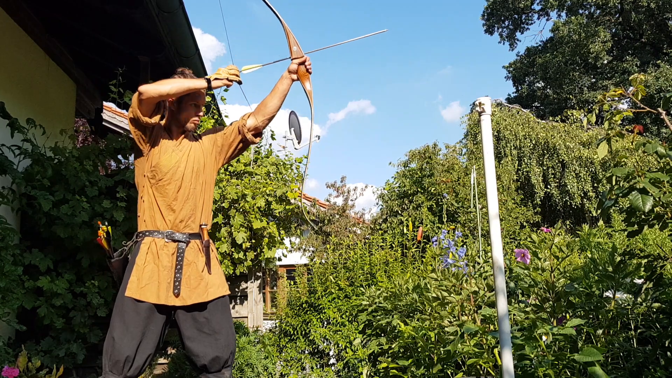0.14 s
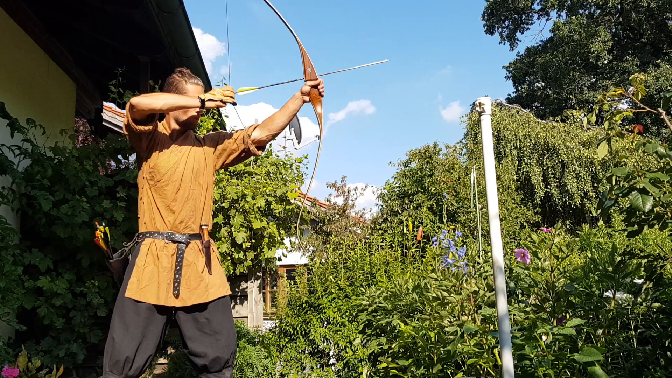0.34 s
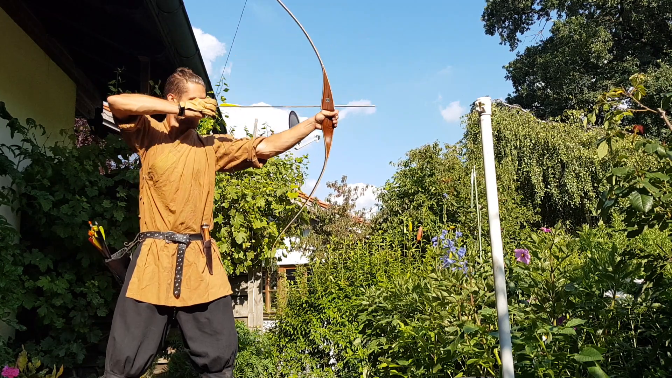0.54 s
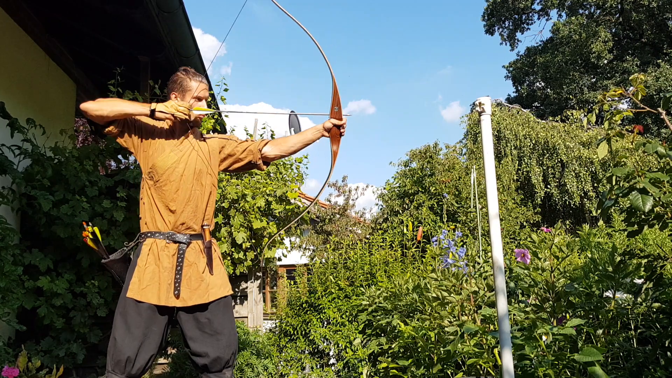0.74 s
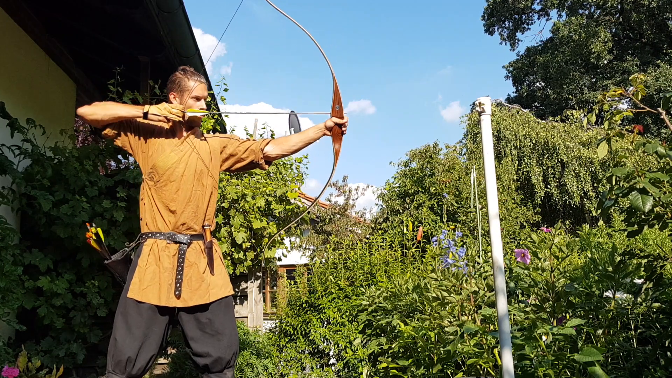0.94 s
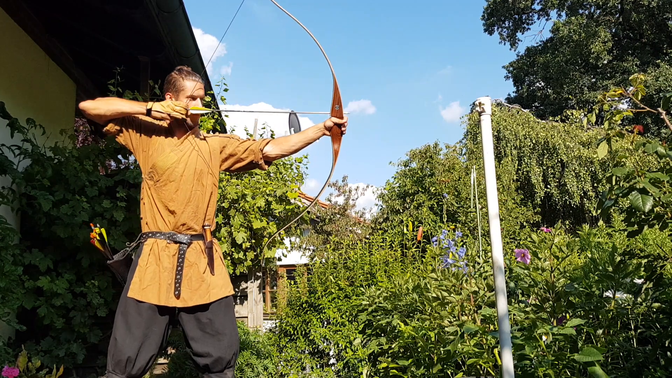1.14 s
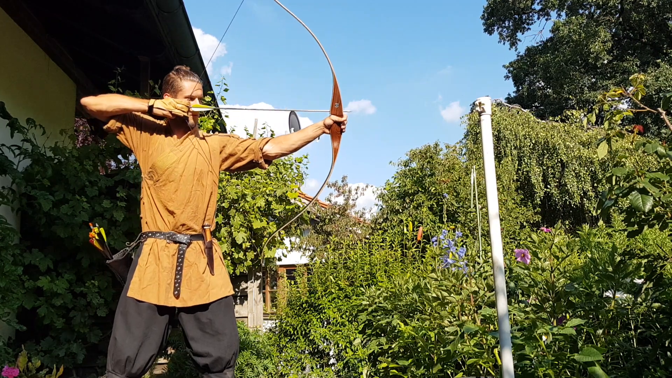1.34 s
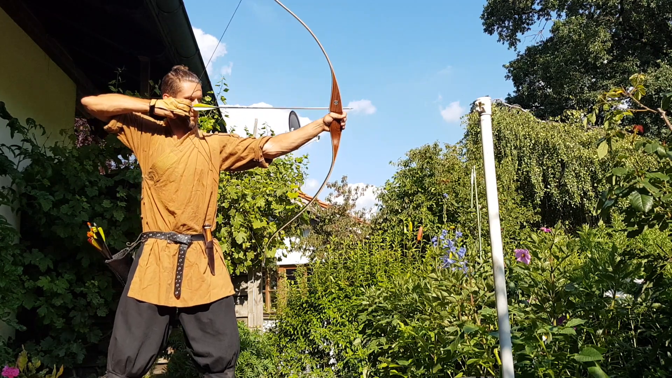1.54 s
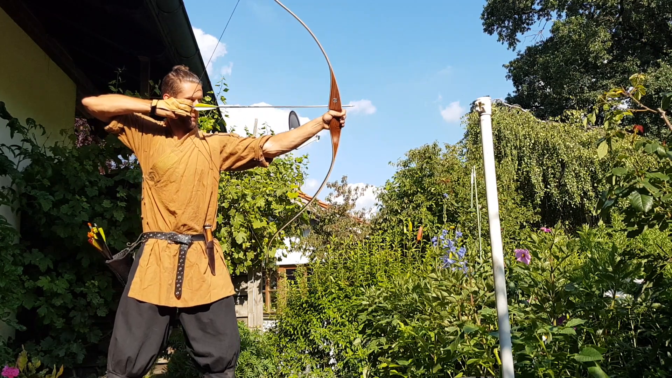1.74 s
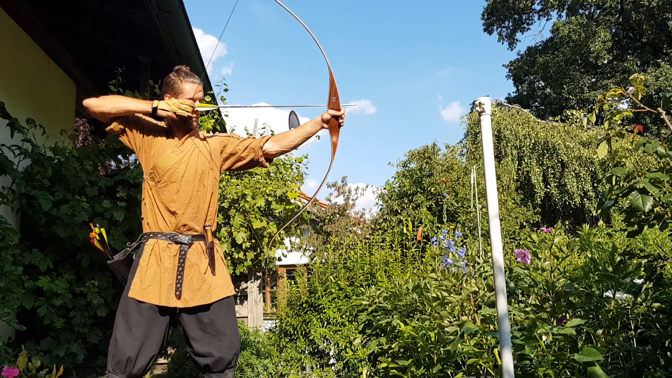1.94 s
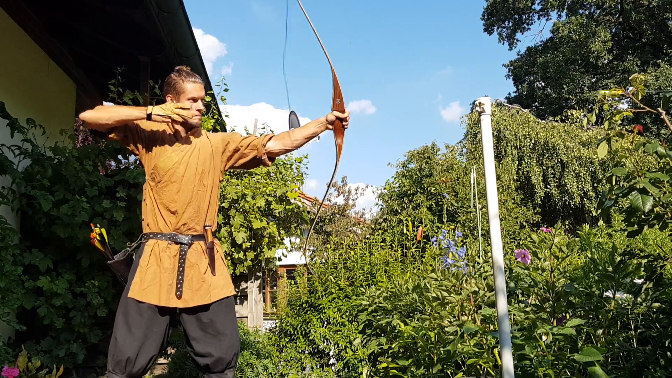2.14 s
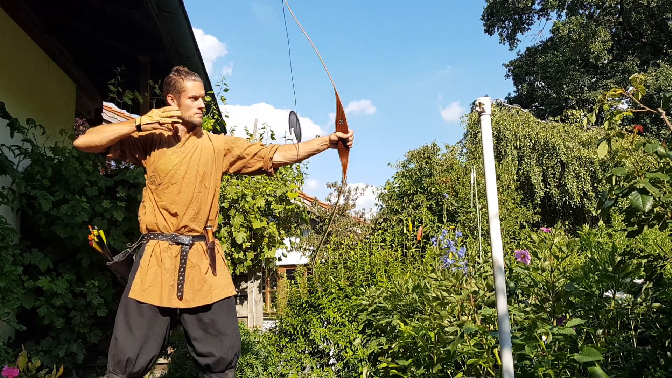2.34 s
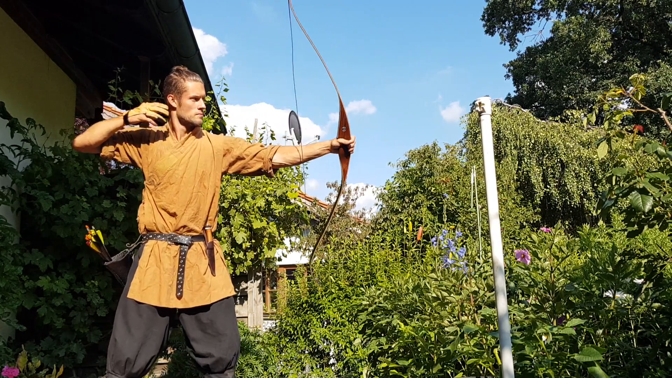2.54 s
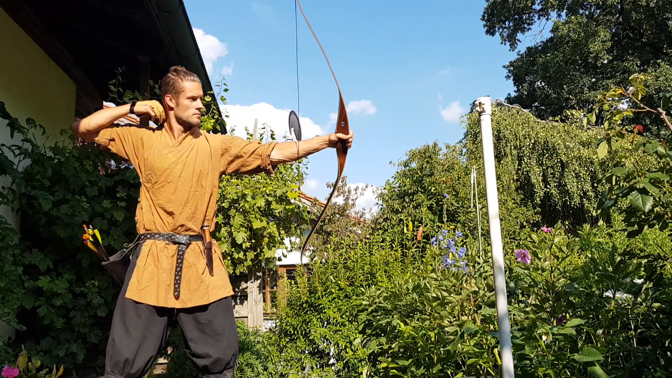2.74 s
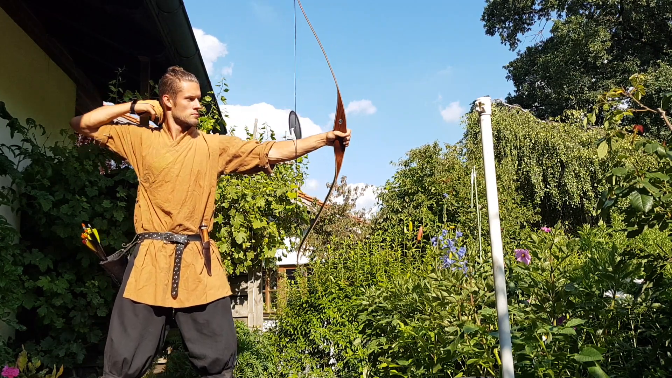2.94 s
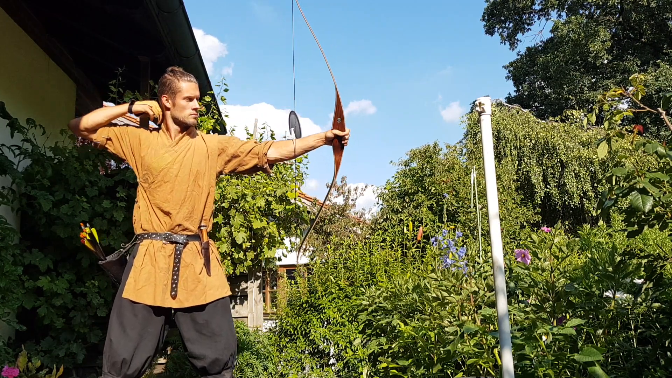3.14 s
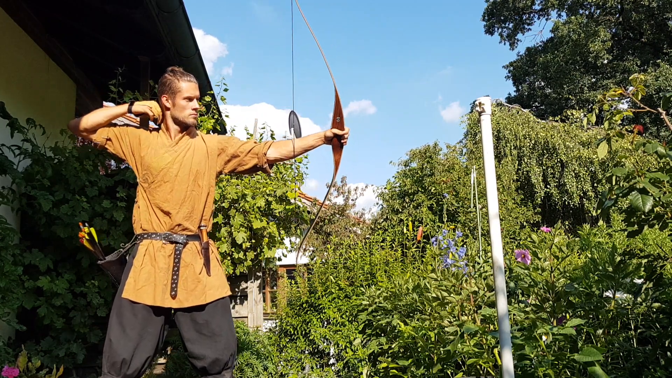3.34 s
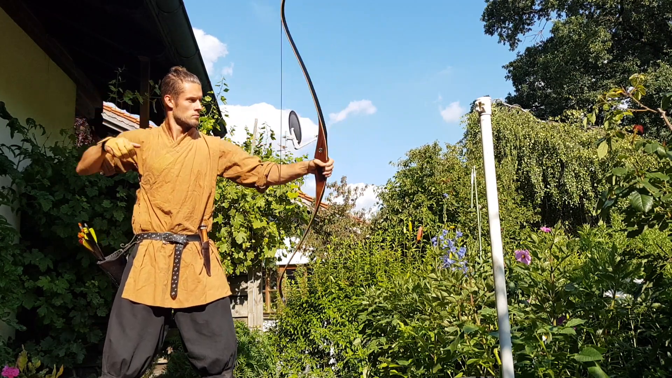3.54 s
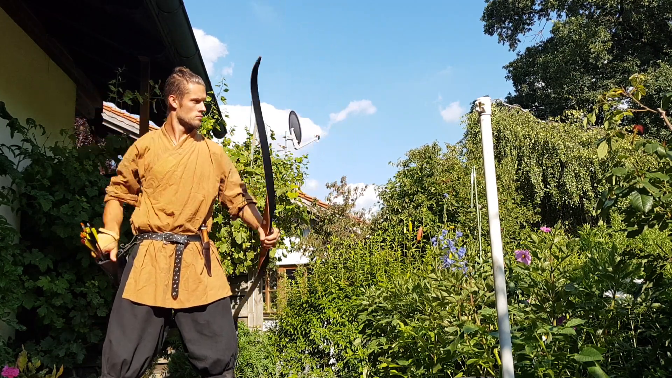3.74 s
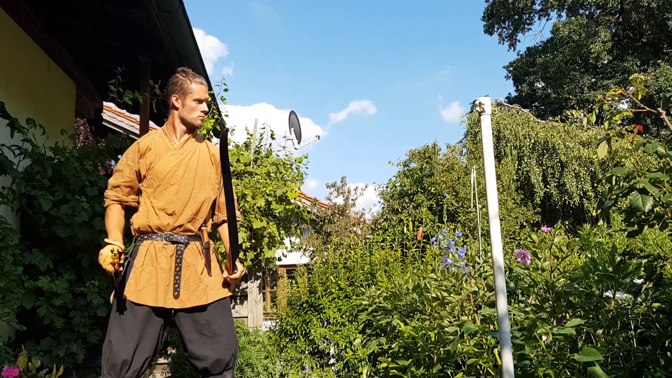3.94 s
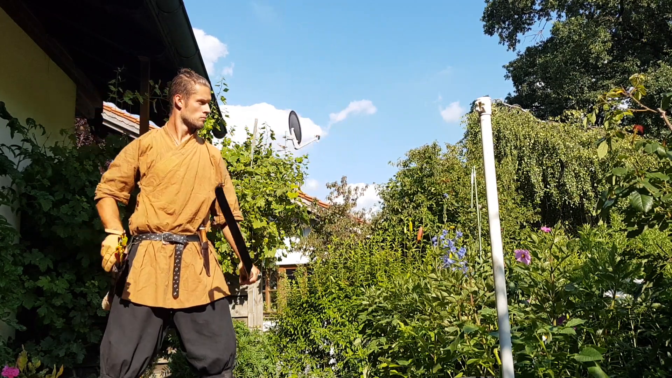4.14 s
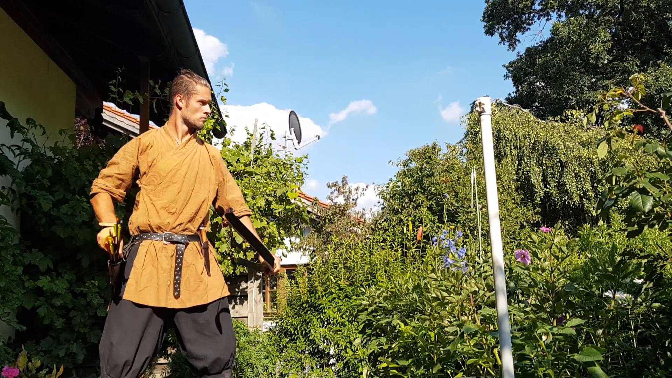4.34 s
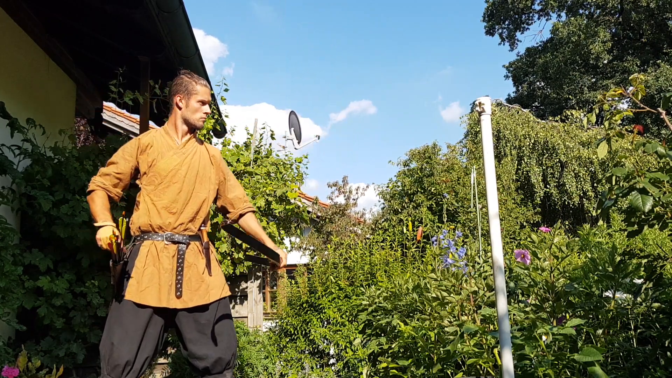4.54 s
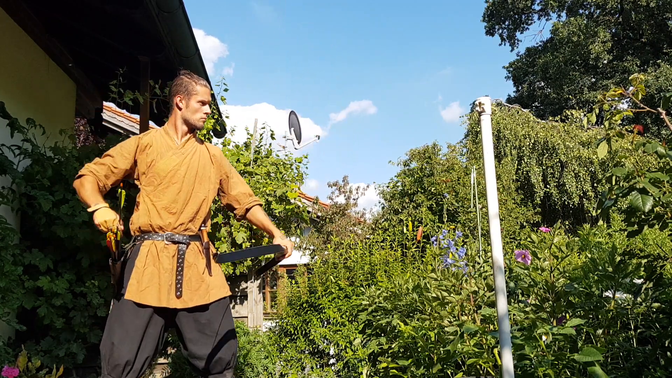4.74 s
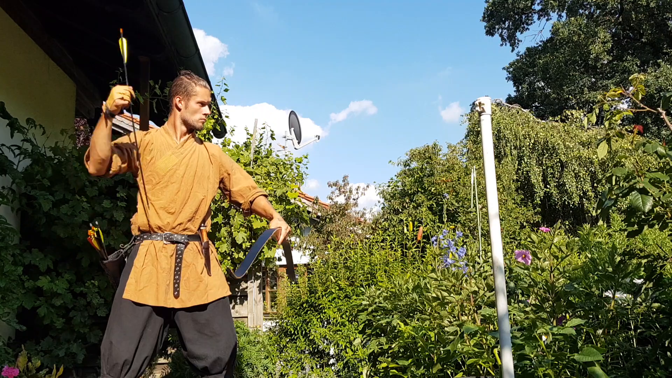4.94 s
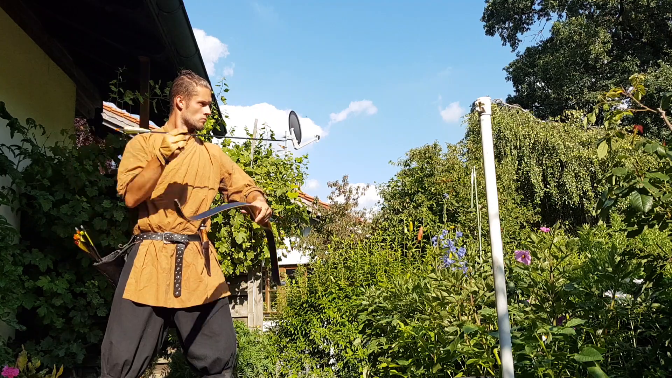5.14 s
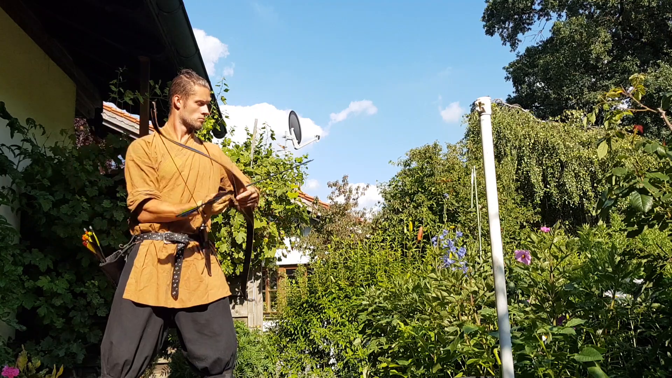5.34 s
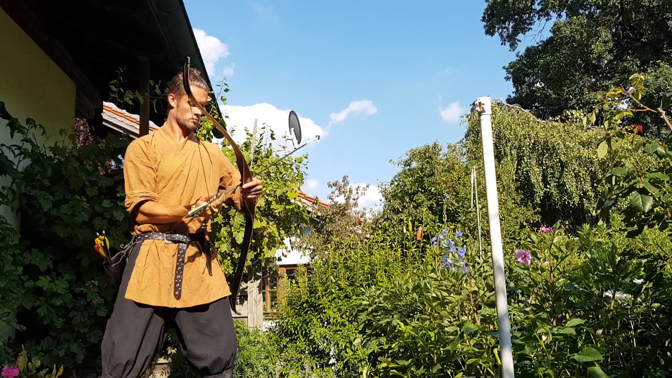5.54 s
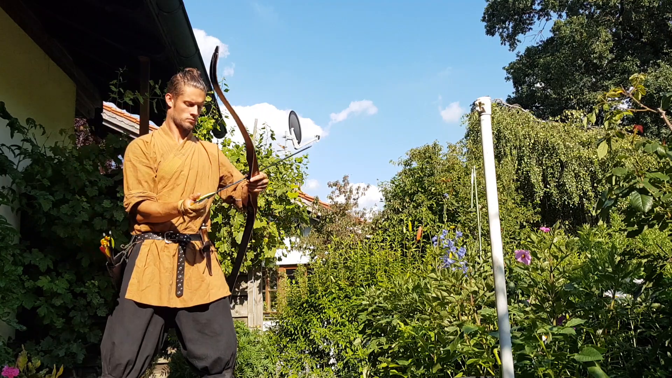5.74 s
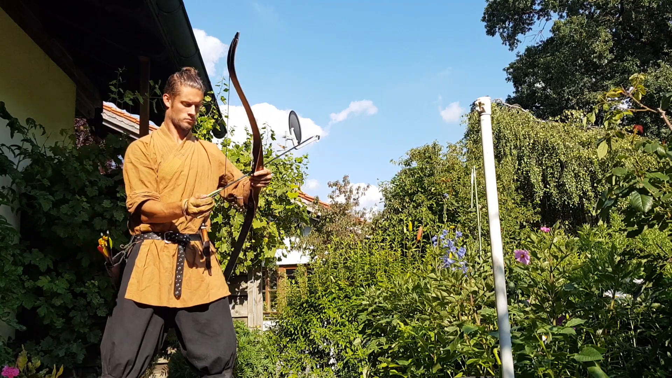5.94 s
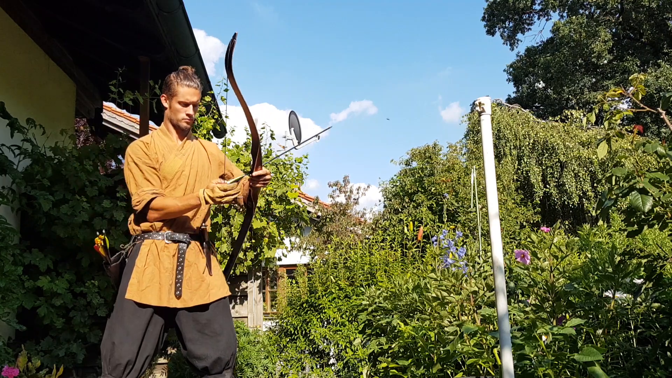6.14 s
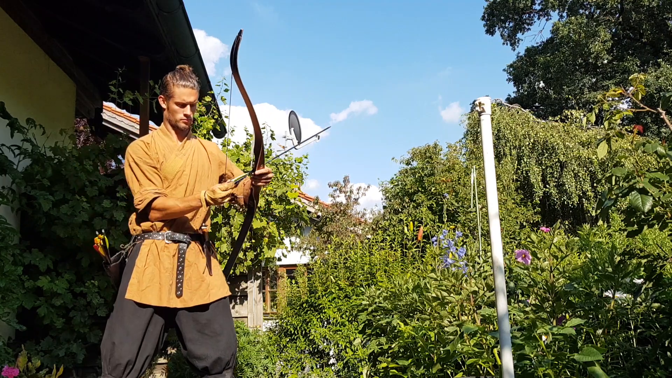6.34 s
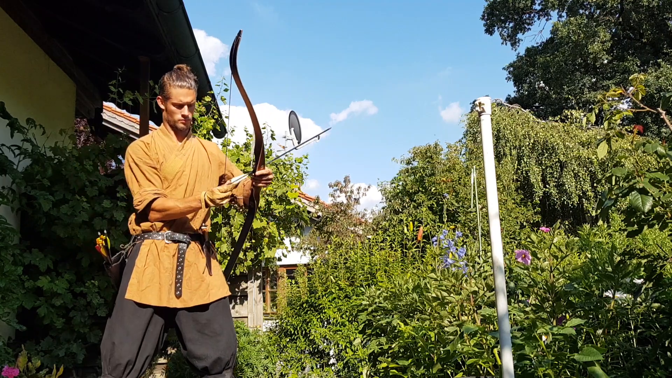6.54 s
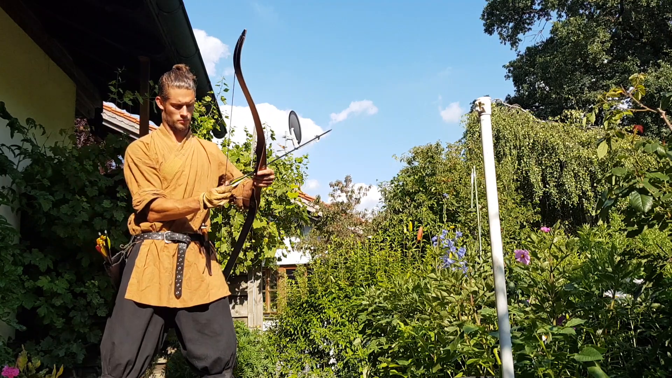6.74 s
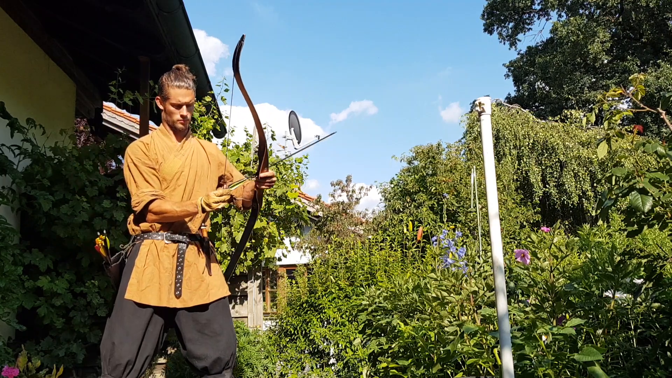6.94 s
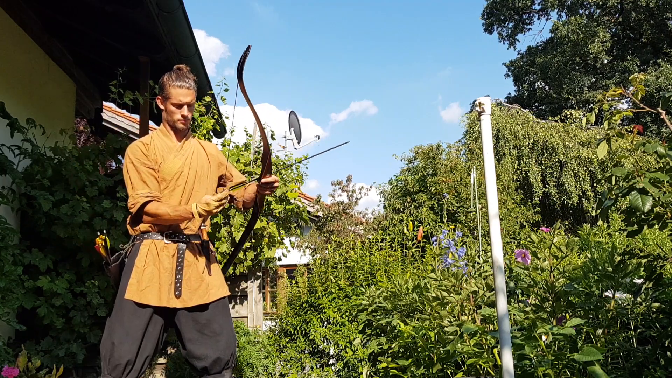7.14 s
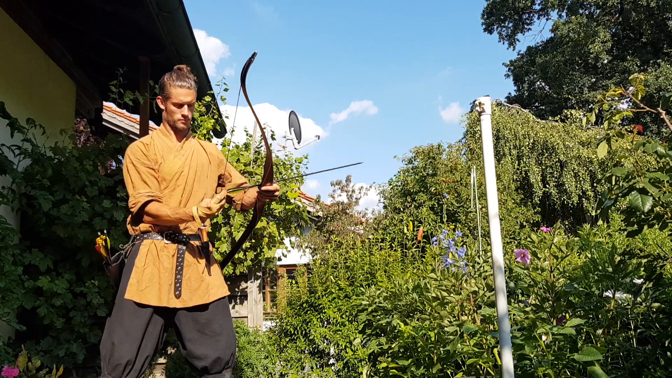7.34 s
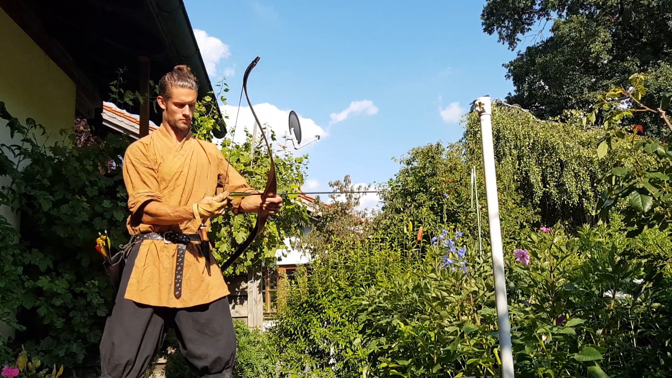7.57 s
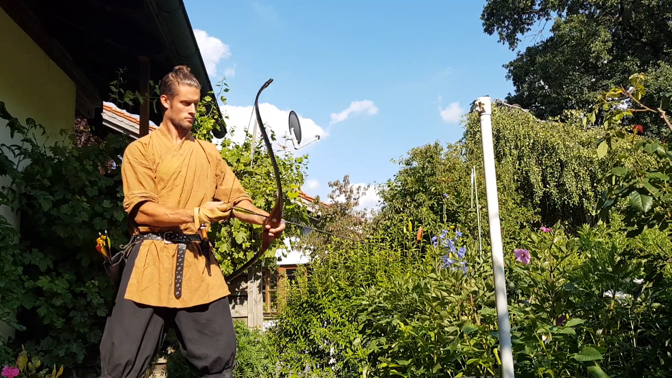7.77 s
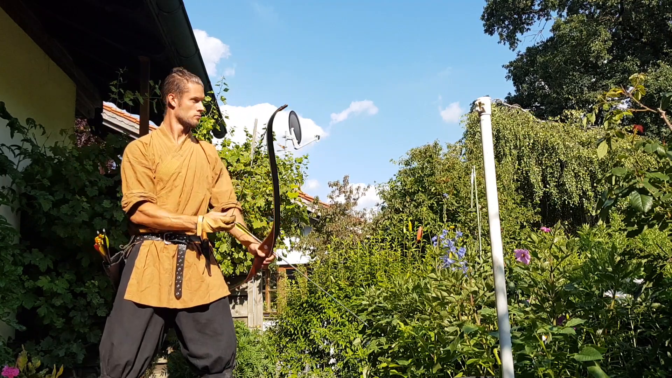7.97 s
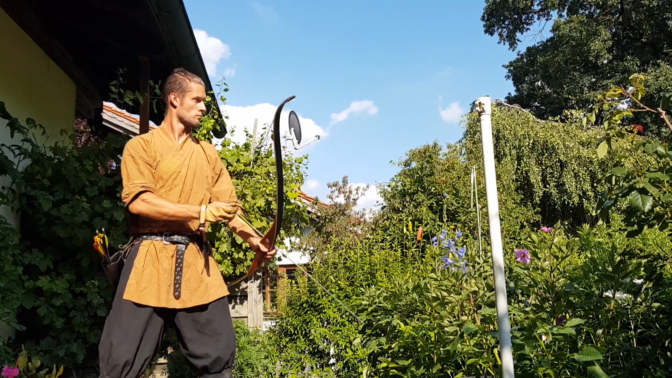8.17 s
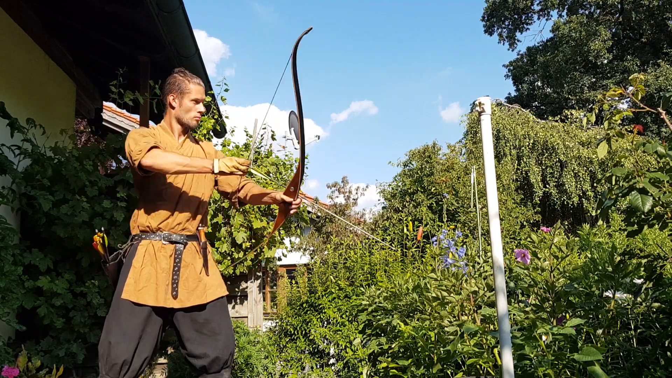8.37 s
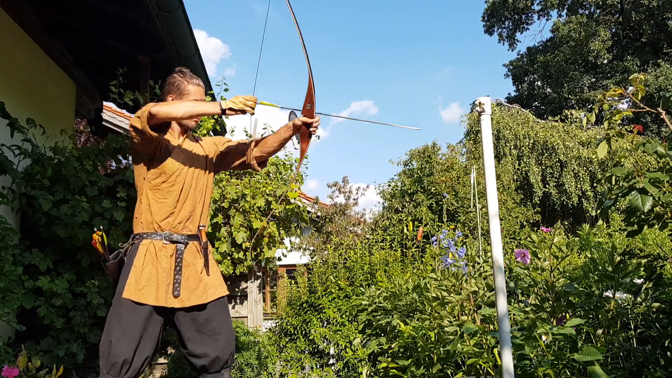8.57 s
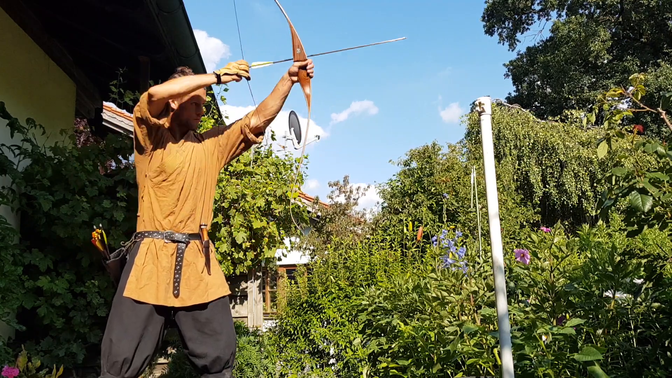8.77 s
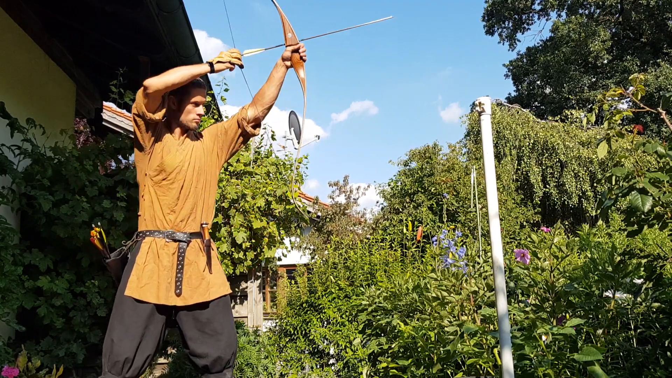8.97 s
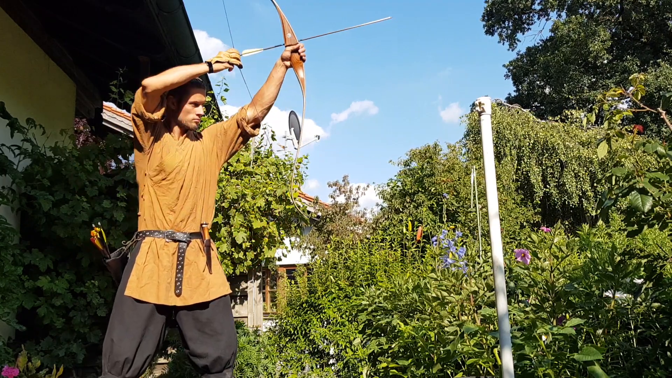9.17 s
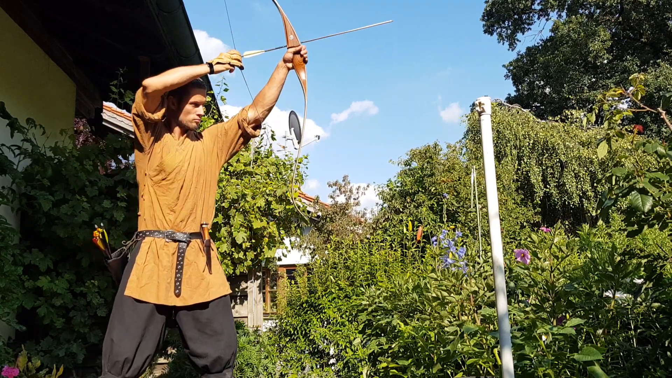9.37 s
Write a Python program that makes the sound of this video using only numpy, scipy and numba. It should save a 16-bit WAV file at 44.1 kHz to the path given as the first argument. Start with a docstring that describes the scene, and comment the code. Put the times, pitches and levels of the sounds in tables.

```python
"""A bow looses an arrow close by in a summer garden: a gritty rush, ringing limbs and string, then cracks and thuds
from a target. The next arrow comes out of a hip quiver: noise rattles with ringing modes, and rubbing noise.
Behind, a bush cricket (pulsed noise), birds (short whistled glides), distant engines (wavering partials with noise
skirts), a soft wash and the garden air. Noise tails return the handling and hits from the house walls."""
import sys
import numpy as np
from scipy import signal
from scipy.fft import rfft, irfft
from scipy.io import wavfile
from scipy.ndimage import uniform_filter1d
from numba import njit

SR = 44100
rng = np.random.default_rng(int(sys.argv[2]) if len(sys.argv) > 2 else 0)


def unload_audio(sound):
    """Save the sound as a 16-bit wav file, at the path given as the first command line argument."""
    columns = np.transpose(np.atleast_2d(sound))
    # keep every value between -1 and 1, then stretch to whole-number steps
    steps = np.round(np.clip(columns, -1, 1) * 32767)
    wavfile.write(sys.argv[1], SR, steps.astype(np.int16))


N = 414981
TIME = np.arange(N) / SR

# All levels are relative: each layer is balanced again in its function or in scene().
# force of the release, the string rushing home and slapping the limbs: time_s, level_db
RELEASE_FORCE = [(2.150, -70), (2.153, -32), (2.161, -33.5), (2.170, -23), (2.18, -24.5), (2.2, -28),
                 (2.215, -31), (2.226, -36), (2.27, -46.5), (2.35, -59.5), (2.47, -70.5)]
# spectrum of the slap: frequency_hz, level_db
SLAP_SPECTRUM = [(120, -42), (230, -7.5), (450, -2), (700, -4), (1110, -3), (1600, -8.5), (2860, -8),
                 (3400, -9.5), (4840, -6.5), (8000, -17), (15500, -25)]
# resonances of the bow limbs: pitch_hz, level_db, t60_s
LIMB_MODES = [(660, -7, .06), (900, -6, .07), (1130, -7, .05), (1254, -8, .07), (1486, 0, .1),
              (1857, -5, .07), (2078, -5, .07), (2234, -5, .06), (2470, -5, .06), (2850, -2, .04),
              (4727, -6, .05)]
# partials of the humming string: pitch_hz, level_db, t60_s
STRING_PARTIALS = [(220, -14.5, 0.31), (447.3, -0.5, .6), (540, -19, .2), (650, -22, .2), (883, -8.5, 0.24)]
# arrow in the target, the point cracks in and the butt gives: start_s, crack_db, thud_db
STRIKE_HITS = [(2.4965, -20.5, -57), (2.505, -51, -21), (2.5100, -29.5, -55), (2.5181, -52, -23)]
# resonances of the arrow point: pitch_hz, level_db, t60_s
POINT_MODES = [(739, -8, 0.042), (2075, 1, 0.034), (2600, 3.5, 0.01), (4100, -20, 0.015),
               (6600, -3.5, 0.0045)]
# resonances of the straw butt: pitch_hz, level_db, t60_s
BUTT_MODES = [(100, -20, .06), (235, 0, .035), (350, -7, .07), (650, -18, .03)]
# knocks of shafts, quiver and bow, and the sharp onsets of some rubs:
# start_s, peak_db, decay_s, shaft_ring_db, quiver_ring_db
HANDLING_KNOCKS = [(3.812, -42, 0.012, -14.5, -14), (3.9726, -38.5, 0.026, -15, -30),
                   (4.2826, -20.5, 0.024, -22, -9), (4.357, -38.5, 0.019, -5, -30),
                   (4.46, -49, 0.013, -14, -13), (4.579, -49, 0.012, -24, -25),
                   (5.3635, -32.5, 0.035, -6.5, -15), (5.3660, -29, 0.0013, -23, -23),
                   (5.3912, -37, 0.011, 6, -16), (5.398, -32.5, 0.021, -11, -15),
                   (5.4012, -25, 0.0021, -25, -25), (5.588, -58, 0.037, 3, 1)]
# resonances of the arrow shafts: pitch_hz, level_db, t60_s
SHAFT_MODES = [(600, 6, .09), (1244, 1, .05), (1906, -9, .05), (2600, -8, .03), (3700, -2, .03),
               (4673, 0, .04), (5800, -6, .02), (6900, -8, .02)]
# resonances of the quiver: pitch_hz, level_db, t60_s
QUIVER_MODES = [(340, -9, .05), (705, 6, .045), (900, 3, .03)]
# spectrum of a knock or sharp onset: frequency_hz, level_db
CLACK_SPECTRUM = [(180, -49), (300, -19.5), (492, -39), (744, -10.5), (1220, -8), (2100, -5.5), (3630, -3),
                  (3940, 0.5), (11100, -7), (15500, -28)]
# rubs of feathers, leather and cloth: peak_s, peak_db, rise_s, fall_s (times for 30 dB)
RUBS = [(0.756, -69.5, .6, 0.22), (3.814, -46, 0.021, 0.15), (3.982, -50, .06, 0.34),
        (4.08, -56, 0.1, 0.15), (4.19, -54, 0.094, 0.34), (4.245, -50.5, 0.11, 0.41),
        (4.468, -55, 0.028, 0.17), (4.58, -55, 0.015, 0.63), (4.70, -70.5, 0.57, 1),
        (4.80, -53.5, 0.27, .1), (4.832, -46.5, 0.041, 0.16), (5.788, -61, 1., 0.14),
        (6.1, -76, 0.39, 0.57), (6.28, -64.5, 0.55, .2)]
# spectrum of rubbing: frequency_hz, level_db
RUB_SPECTRUM = [(240, -39), (400, -18), (749, -5.5), (1590, -8.5), (2190, -7), (2430, -4), (4560, 0.5),
                (7100, -3.5), (13300, -10), (15500, -24)]
# bouts of the bush cricket: start_s, stop_s, level_db, beats_per_s, first_phase (place in the beat, 0-1)
CRICKET_BOUTS = [(-.1, .85, -65.5, 18.4, .44), (1.47, 6.42, -64, 18.815, 0.73),
                 (6.722, 9.5, -64.5, 18.75, 0.4)]
# wing strokes within a beat: place (0-1), level_db, width (beats)
WING_STROKES = [(.11, -5, .06), (.77, -6.5, .06)]
# spectrum of the cricket's wings: frequency_hz, level_db
WING_SPECTRUM = [(6500, -42), (8000, -13), (9000, -10), (9700, -1), (10800, 2.5), (11800, -6.5),
                 (12800, -15), (13600, -24), (15500, -42.5)]
# single sweeps of nearer birds: start_s, level_db, from_hz, to_hz, length_s
NEAR_CHIRPS = [(0.141, -63.5, 4400, 5100, 0.024), (0.265, -70, 3500, 4200, 0.044),
               (0.843, -66, 4400, 5700, .018), (0.975, -70, 2600, 3630, 0.02),
               (1.14, -67, 4300, 5370, 0.041), (3.067, -65, 4000, 5350, 0.026),
               (3.17, -68, 4300, 5200, 0.027), (3.286, -69, 3900, 5360, .025),
               (3.435, -66, 4200, 5700, 0.028), (3.598, -72, 2800, 3600, .04), (3.67, -67, 3500, 4100, .04),
               (5.998, -52.5, 4280, 5300, 0.018), (6.567, -67, 4600, 6200, 0.037),
               (6.687, -59, 4100, 5400, 0.028), (6.956, -58.5, 3960, 5330, 0.022),
               (7.675, -62, 4100, 5100, 0.035), (8.625, -62, 2995, 4590, .035),
               (9.35, -63, 3100, 4780, 0.028)]
# bursts of twitter from far birds: middle_s, length_s, level_db, pitch_hz
TWITTER_BURSTS = [(0.028, .06, -71, 4850), (0.463, 0.075, -71, 4000), (0.707, 0.18, -60, 3670),
                  (.88, .08, -68.5, 4600), (1.004, 0.063, -76, 4800), (1.17, .08, -81, 4700),
                  (1.34, 0.093, -73, 3890), (1.572, 0.042, -74, 5320), (1.816, 0.072, -69.5, 4030),
                  (1.98, 0.22, -64, 4500), (2.8, 0.087, -73, 4880), (3.078, 0.066, -72, 4530),
                  (3.182, 0.077, -73, 3880), (3.36, 0.29, -62.5, 4530), (3.623, .08, -71, 3490),
                  (3.753, 0.068, -72, 4340), (4.949, .12, -63.5, 4490), (5.056, 0.047, -61, 4390),
                  (5.32, .08, -65, 4280), (5.759, .15, -64, 3740), (6.028, 0.091, -63, 4480),
                  (6.282, 0.13, -64, 3900), (6.57, 0.074, -63.5, 5100), (6.68, 0.15, -63.5, 3510),
                  (6.848, 0.077, -65.5, 4330), (7.121, 0.15, -59.5, 3485), (7.27, 0.059, -63.5, 4300),
                  (7.358, .08, -64.5, 3710), (7.519, 0.17, -66, 5290), (7.72, .08, -64.5, 4200),
                  (7.856, 0.13, -60.5, 4500), (8.058, 0.18, -58.5, 4500), (8.248, 0.11, -65.5, 3860),
                  (8.396, 0.083, -63.5, 4790), (8.504, 0.11, -64.5, 4910), (8.621, .12, -60, 3930),
                  (8.881, .14, -67.5, 3032), (9.1, 0.15, -66.5, 4620), (9.299, .1, -68.5, 3600),
                  (9.38, 0.066, -63.5, 4200)]
# steady chirping of the rest of the flock: time_s, level_db
FLOCK_LEVEL = [(0, -84), (3.7, -80.5), (5, -75), (6, -72.5), (9.41, -72.5)]
# an engine fading away: time_s, fundamental_hz, second_partial_db, upper_partials_db
DRONE_COURSE = [(0, 54.06, -37.5, -58), (.35, 58.03, -43, -58.5), (.52, 61.88, -33.5, -41.5),
                (.7, 56.02, -36.5, -63), (.79, 55.13, -50.5, -57), (1.18, 57.11, -42, -67.5),
                (1.48, 54.87, -46.5, -59.5), (1.84, 53.65, -42, -65), (2.07, 52.72, -47.5, -57),
                (2.3, 50.76, -47.5, -47), (2.7, 50, -51.5, -61.5), (3.04, 48.97, -57, -60),
                (3.15, 48.96, -48, -59.5), (3.64, 50.2, -67.5, -60.5), (3.91, 50.52, -52.5, -56),
                (4.27, 50.46, -50, -61.5), (4.38, 48.71, -60, -70), (4.56, 47.11, -55.5, -68),
                (4.81, 46.53, -63, -66), (4.93, 46.37, -53, -62.5), (5.46, 45.2, -62, -71),
                (5.62, 44.6, -72, -76), (6.1, 43.1, -61, -80), (6.54, 43.05, -57.5, -71),
                (6.7, 42.5, -72.5, -83), (7.3, 42, -79, -90)]
# a later, lower motor: time_s, fundamental_hz, level_db
MOTOR_COURSE = [(7.0, 31.4, -71.5), (7.5, 31.2, -59), (8.4, 30.92, -56), (9.2, 31.36, -59),
                (9.41, 31.3, -62.5)]
# partials of that motor: multiple (of the fundamental), level_db
MOTOR_PARTIALS = [(1, -28), (2, -24), (3, 1.5), (4, -19.5), (5, -20), (6, -17), (7, -25.5)]
# swells of the soft mid-range wash: peak_s, peak_db, rise_s, fall_s (times for 30 dB)
WASH_SWELLS = [(1.37, -73, .5, 0.47), (1.8, -76.5, 0.27, 0.27), (6.55, -75.5, 2., 0.35),
               (7.44, -68, 0.28, .2), (8.58, -69, .3, 0.23), (9.0, -75, 0.23, 0.086)]
# spectrum of the garden air: frequency_hz, level_db
AIR_SPECTRUM = [(15, -40.5), (30, -24), (60, -14), (105, -2), (140, -8), (240, -20.5), (400, -25),
                (800, -29.5), (1600, -35), (2500, -37), (4800, -33), (6300, -36.5), (10000, -35.5),
                (15700, -41)]
# house walls and hedges, decay of each echo band: centre_hz, t60_s
ECHO_BANDS = [(250, 0.93), (700, 0.85), (2000, 0.29), (5000, 0.17), (11000, 0.32)]
# likeness of the left and right noise: frequency_hz, likeness (0-1)
STEREO_LIKENESS = [(60, 1), (150, 0.91), (300, .78), (640, 0.31), (1400, 0.026), (15000, 0.16)]

RUSH_LOW_HZ, RUSH_RISE_HZ, RUSH_LAW = 800, 2100, 2.5  # centre at rest, rise at full force, steepness
TWANG_S, TWANG_DB = 2.215, -27.5  # the string settles into its own ring
BOUT_FADE_S = .1
# width of the scatter, as a share of the pitch, for the flock and for the twitter
FLOCK_HZ, FLOCK_SPREAD, TWITTER_SPREAD = 4200, .55, 0.2202
ROOT_DB, ROOT_FADE_DB_PER_S = -43.5, 3.5  # the drone's fundamental simply fades
WASH_DB, AIR_DB = -85.5, -59.5
TOP_HZ = 15800


def release():
    """The string's force drives a rush that rises and falls in pitch, rings the limbs and leaves a hum."""
    span = slice(2 * SR, 3 * SR)
    force = undb(curve(RELEASE_FORCE, 1, -200))[span]
    grit = pair(SR, 1.5)
    # the faster the string, the higher the rush and the more broad hiss comes with it
    centre_hz = RUSH_LOW_HZ + RUSH_RISE_HZ * (force / force.max()) ** RUSH_LAW
    slap = colour(grit, SLAP_SPECTRUM)
    rush = band(grit, centre_hz, 1300) + (centre_hz / 2500) ** 1.307 * slap
    limbs = ring(slap * force, LIMB_MODES)
    t = np.clip(TIME[span] - TWANG_S, 0, None)
    swell = (1 - np.exp(-t / 0.01)) * undb(1.1 * walk(25)[span])  # the hum wavers slightly in level at random
    hum = sum(undb(db - 60 * t / t60) * np.sin(2 * np.pi * hz * t) for hz, db, t60 in STRING_PARTIALS)
    twang = undb(TWANG_DB) * swell * hum * undb([[1.5], [-1.5]])
    return place(rush * force + undb(-35.5) * limbs + twang, 2)


def strike():
    """Single-sample cracks ring the point, soft pushes ring the butt, and decaying noise crunches the straw."""
    cracks, thuds = np.zeros((2, N))
    for s, crack_db, thud_db in STRIKE_HITS:
        cracks[int(s * SR)] = undb(crack_db)
        thuds[int(s * SR)] = -undb(thud_db)
    span = slice(2 * SR, 3 * SR)
    push = np.hanning(int(0.001 * SR))
    pushes = signal.lfilter(push / push.sum(), 1, thuds[span])
    point = 0.52 * ring(cracks[span], POINT_MODES, sign=-0.86)
    butt = ring(pushes, BUTT_MODES)
    t = TIME[span] - STRIKE_HITS[0][0]
    straw = band(band(pair(SR, 1.9), 890, 2300), 1040, 5030)
    crunch = undb(-39.5) * (t > 0) * np.exp(-t / 0.049) * straw
    return place((point + butt) * undb([[-1], [1]]) + crunch, 2)


def knocks():
    """Each knock or sharp rub onset is a short noise rattle that also excites shaft and quiver modes."""
    out, n = 0, SR // 4
    for s, db, decay_s, shaft_db, quiver_db in HANDLING_KNOCKS:
        rattle = colour(pair(n, 3.5), CLACK_SPECTRUM) * np.exp(-np.arange(n) / SR / decay_s)
        rings = undb(shaft_db) * ring(rattle, SHAFT_MODES) + undb(quiver_db) * ring(rattle, QUIVER_MODES)
        out = out + place(undb(db - 3.0) * (rattle + undb(-25.0) * rings), s)
    return out


def rustle():
    """Rubbing surfaces give crackling noise, with small ticks and scrapes whose colour wanders."""
    crackle = undb(2 * walk(60)) * colour(pair(N, 3.2), RUB_SPECTRUM)
    scrape_hz = 3800 * np.exp(0.5 * walk(13))
    scrapes = undb(4.5 * walk(35)) * band(pair(N, 2.1), scrape_hz, 3100)
    return swells(RUBS) * (undb(4.0) * crackle + undb(-2.0) * scrapes)


def cricket():
    """Two grainy wing strokes a beat, pulses of high noise over a constant floor."""
    beat, sings = np.zeros((2, N))
    for start, stop, db, rate, first in CRICKET_BOUTS:
        edge_s = np.minimum(TIME - start, stop - TIME)
        inside = np.clip(edge_s / BOUT_FADE_S + .5, 0, 1)
        beat = np.where(inside > 0, (first + rate * (TIME - start)) % 1, beat)
        sings = sings + undb(db) * inside ** 2
    strokes = .4 + sum(undb(db) * np.exp(-.5 * ((beat - at) / width) ** 2) for at, db, width in WING_STROKES)
    wing = colour(pair(N, 1.5) * strokes * undb(2.2 * walk(19)), WING_SPECTRUM)
    return wing * sings * undb(1.0 * walk(2.5)) * undb([[-.5], [1.5]])


def birds():
    """Short steep chirps scattered round a pitch and blurred by echoes; nearer birds also arrive direct."""
    flock, song, near = np.zeros((3, N + SR))

    def add(out, s, gain, hz, glide, length):
        """Add one chirp; glide and length are random draws, 0-1."""
        n = int((.01 + .025 * length) * SR)
        rise = 0.56 * (glide - .35)  # mostly upward
        out[max(int(s * SR), 0):][:n] += gain * sweep(n, hz * (1 - rise), hz * (1 + rise))

    for when, spread, glide, length, size in rng.random((1200, 5)):
        hz = FLOCK_HZ * (1 + FLOCK_SPREAD * (spread - .5))
        add(flock, when * N / SR, undb(12 * size), hz, glide, length)
    draws = rng.random((len(TWITTER_BURSTS), 12, 5))
    for (middle, span, db, pitch), chirps in zip(TWITTER_BURSTS, draws):
        for when, spread, glide, length, size in chirps:
            hz = pitch * (1 + TWITTER_SPREAD * (spread - .5))
            add(song, middle + span * (when - .5) - .02, undb(db + 6.09 * (size - 1)), hz, glide, length)
    song[:N] += unit(flock[:N]) * undb(curve(FLOCK_LEVEL, 1))
    for s, db, from_hz, to_hz, length in NEAR_CHIRPS:
        n = int(length * SR)
        near[int(s * SR):][:n] += undb(db) * sweep(n, from_hz, to_hz)
    blur = pair(SR // 4) * np.exp(-np.arange(SR // 4) / SR / 0.033)
    blur /= np.sqrt(np.sum(blur[0] ** 2))
    far = signal.fftconvolve((song + undb(-2.5) * near)[None], blur, axes=1)
    return undb(5.0) * far[:, :N] + near[:N]


def engines():
    """Low partials that waver as the air carries them, each with a rough skirt of narrow noise."""
    base, upper = curve(DRONE_COURSE, 1), curve(DRONE_COURSE, 3, -200)
    steady = np.clip(TIME - 1.8, .3, 1)  # while it revs only the second partial is clear
    root = ROOT_DB - ROOT_FADE_DB_PER_S * TIME
    levels = root, curve(DRONE_COURSE, 2, -200), upper - 4, upper - 3, upper - 12
    voices = [(base * (k + 1), db, 1 if k == 1 else steady) for k, db in enumerate(levels)]
    motor_hz, motor_db = curve(MOTOR_COURSE, 1), curve(MOTOR_COURSE, 2, -200)
    voices += [(motor_hz * k, motor_db + db, 1) for k, db in MOTOR_PARTIALS]
    out = 0
    for hz, db, clear in voices:
        tone = np.sin(2 * np.pi * np.cumsum(hz) / SR) * undb(2.3 * walk(8.3))
        mid, side = (unit(svf(svf(rng.standard_normal(N), hz, 47.0), hz, 47.0)) for _ in range(2))
        skirt = mid + .14 * side * np.array([[1], [-1]])
        level = uniform_filter1d(undb(db), size=900)
        out = out + level * (1.075 * clear * tone + (.85 - 0.34 * clear) * skirt)
    return out * undb([[.5], [-.5]])


def wash():
    """A soft mid-range wash, perhaps a road: band-passed noise with slow swells."""
    return (undb(WASH_DB) + swells(WASH_SWELLS)) * band(pair(N), 700, 830)


def air():
    """The garden's air: wide stereo noise, strongest in the bass, of slightly wandering level."""
    return undb(AIR_DB + 0.91 * walk(7.8)) * colour(pair(N), AIR_SPECTRUM)


def echo(x):
    """Scattered reflections from walls and hedges: a noise tail, each band dying at its own pace."""
    t = np.arange(SR) / SR
    tail = sum(np.sqrt(hz) * band(pair(SR), hz, hz) * np.exp(-np.log(1000) * t / t60) for hz, t60 in ECHO_BANDS)
    tail *= 1 - np.exp(-t / 0.0082)  # soft onset
    return signal.fftconvolve(x, tail / np.sqrt(np.sum(tail[0] ** 2)), axes=1)[:, :N]


def undb(db):
    """Decibels to amplitude."""
    return 10 ** (np.asarray(db) / 20)


def unit(x):
    """Scale to an RMS of 1."""
    return x / np.sqrt(np.mean(x ** 2))


def curve(table, column, off=None):
    """One column of a table over time; off is its value outside the table."""
    rows = np.array(table)
    return np.interp(TIME, rows[:, 0], rows[:, column], off, off)


def along(table, hz):
    """Second column of a table, interpolated over log frequency."""
    rows = np.array(table)
    return np.interp(np.log(hz + 1), np.log(rows[:, 0]), rows[:, 1])


def colour(x, table):
    """Filter x by a frequency_hz, level_db table and scale it to unit RMS."""
    n = x.shape[-1]
    gain = undb(along(table, np.arange(n // 2 + 1) * SR / n))
    return unit(irfft(rfft(x) * gain, n))


def pair(n, grit_db=0.):
    """Two-channel noise, alike in the bass, mostly unrelated in the treble; grit makes it crackle."""
    alike = np.clip(along(STEREO_LIKENESS, np.arange(n // 2 + 1) * SR / n), 0, 1)
    grit = undb(grit_db * np.minimum(rng.exponential(size=n), 7.))
    mid, side = rfft(rng.standard_normal((2, n)) * grit)
    mid, side = mid * np.sqrt(1 + alike), side * np.sqrt(1 - alike)
    return unit(irfft(np.array([mid + side, mid - side]), n))


def ring(x, modes, sign=1):
    """Sum of damped resonances driven by x; each next mode is scaled by a further factor of sign."""
    out = 0
    for k, (hz, db, t60) in enumerate(modes):
        pole = np.exp(2j * np.pi * hz / SR - np.log(1000) / (t60 * SR))
        out = out + sign ** k * undb(db) * signal.lfilter([1], [1, -pole], x).imag
    return out


@njit
def svf(x, hz, width):
    """State-variable band-pass, width in Hz, whose centre can move."""
    y, b, l = np.empty(len(x)), 0., 0.  # output, band state, low state
    for i in range(len(x)):
        g, k = np.tan(np.pi * hz[i] / SR), width / hz[i]
        v = (b + g * (x[i] - l)) / (1 + g * (g + k))
        b, l, y[i] = 2 * v - b, l + 2 * g * v, k * v
    return y


def band(x, hz, width):
    """Band-pass every channel, then scale the pair to unit RMS."""
    return unit(np.array([svf(c, hz + 0 * c, 1. * width) for c in x]))


def walk(rate):
    """Random levels held 1 / rate s and slewed; spread near 1."""
    k = int(SR / rate)
    held = np.repeat(rng.standard_normal(N // k + 1), k)
    return 1.2 * uniform_filter1d(held, k)[:N]


def place(sound, s):
    """Sound starting at s seconds in silence."""
    i = int(s * SR)
    return np.pad(sound, ((0, 0), (i, N - i - sound.shape[1])))


def sweep(n, from_hz, to_hz):
    """A whistled glide of n samples."""
    u = np.linspace(0, 1, n)
    return np.sin(np.pi * u) * np.sin(2 * np.pi * np.cumsum(from_hz + (to_hz - from_hz) * u) / SR)


def swells(table):
    """Gain of events that climb and drop evenly in dB, 30 dB per rise or fall time, round their peak."""
    gain = 0
    for s, db, rise, fall in table:
        away = np.where(TIME < s, (s - TIME) / rise, (TIME - s) / fall)
        gain = gain + undb(np.maximum(db - 30 * away, -200))
    return gain


def scene():
    """Set the near sounds and their wall echoes in the garden's background."""
    shot, hit, handling = release(), strike(), knocks() + rustle()
    near = shot * undb([[.4], [-.4]]) + hit + handling * undb([[.6], [-.6]])
    walls = echo(undb(-16.5) * shot + undb(-17) * hit + undb(-17.5) * handling)
    return near + walls + cricket() + birds() + engines() + wash() + air()


def record(dry):
    """The microphone chain cuts the top steeply: an elliptic low-pass."""
    return signal.sosfilt(signal.ellip(10, .2, 70, TOP_HZ, fs=SR, output="sos"), dry)


dry = scene()
out = record(dry)
unload_audio(out)
```